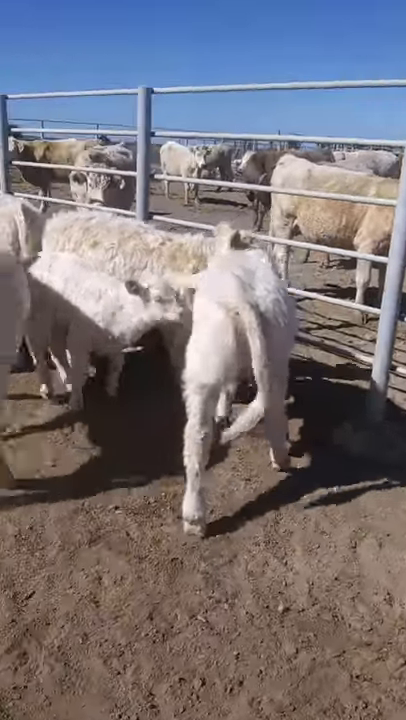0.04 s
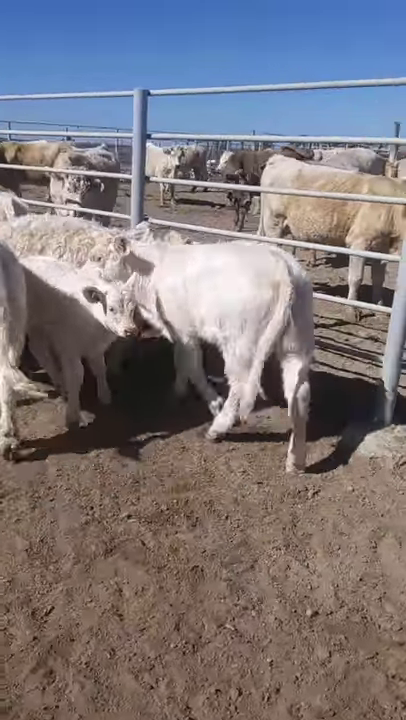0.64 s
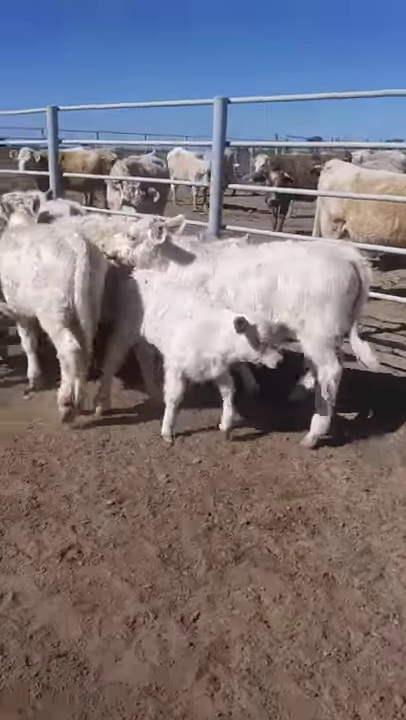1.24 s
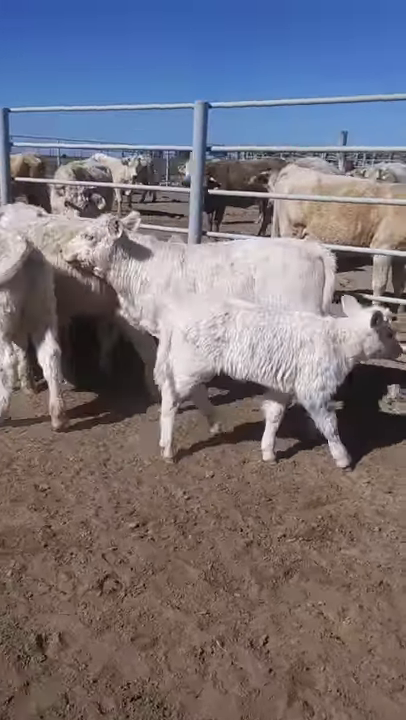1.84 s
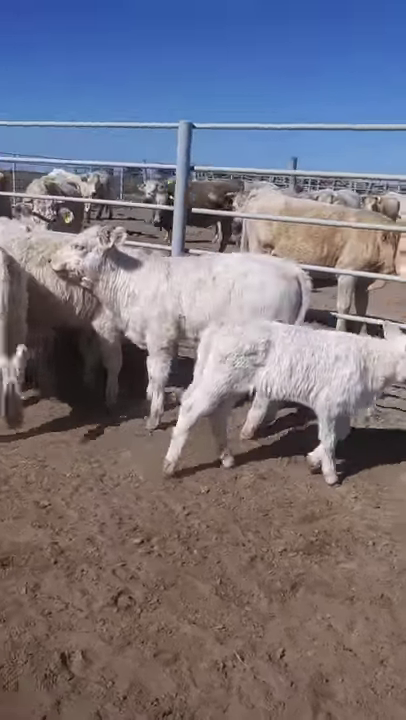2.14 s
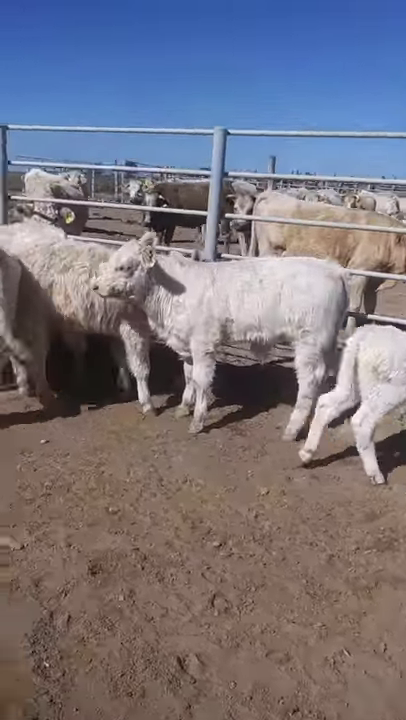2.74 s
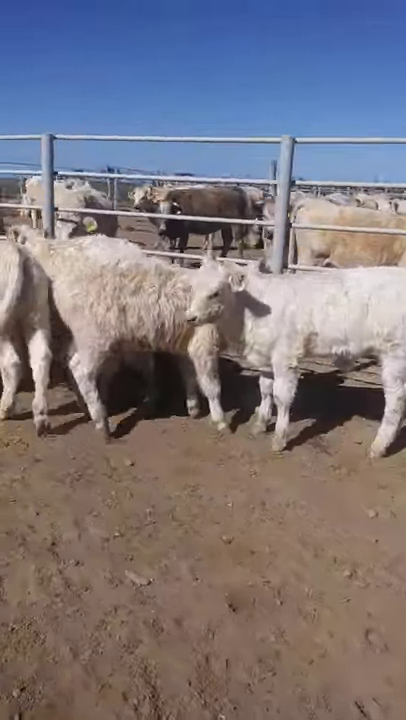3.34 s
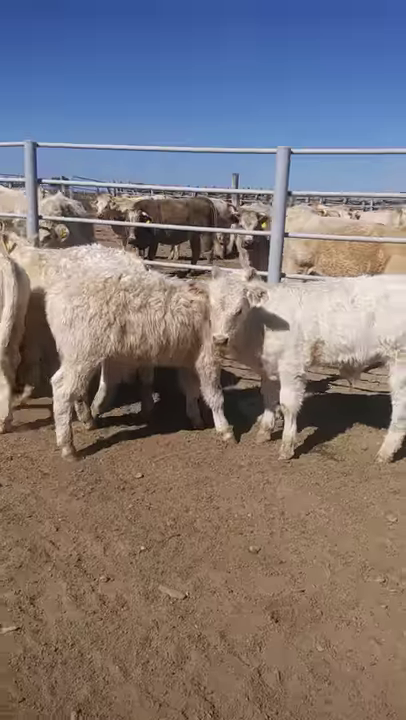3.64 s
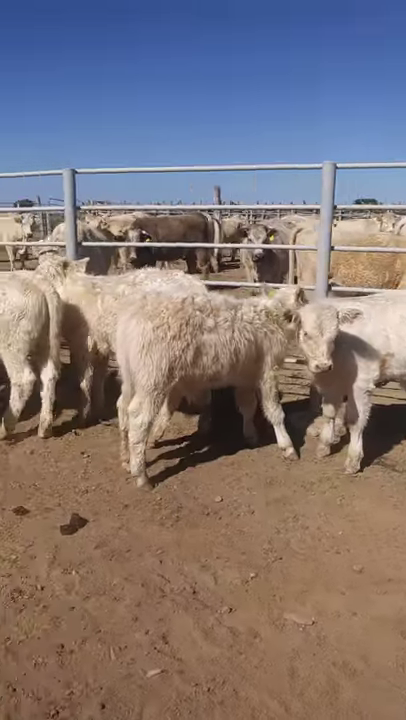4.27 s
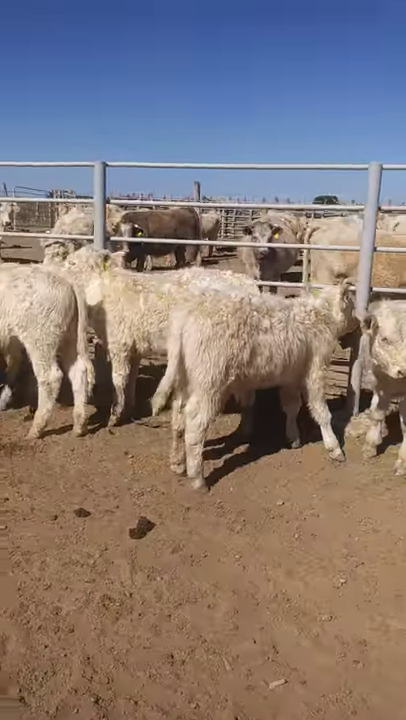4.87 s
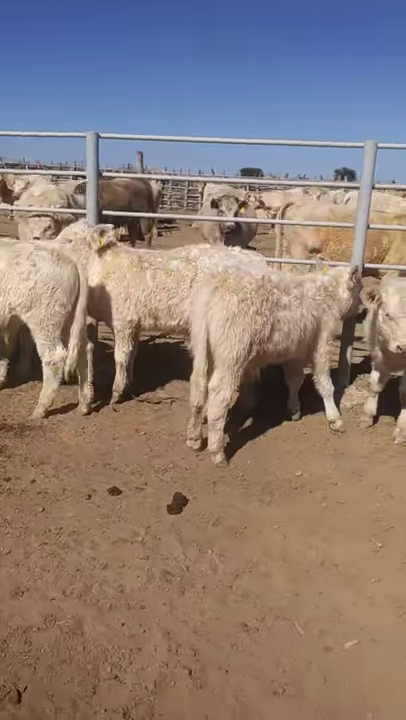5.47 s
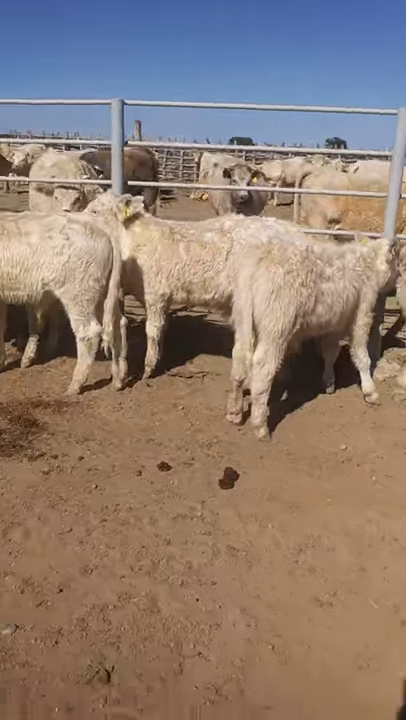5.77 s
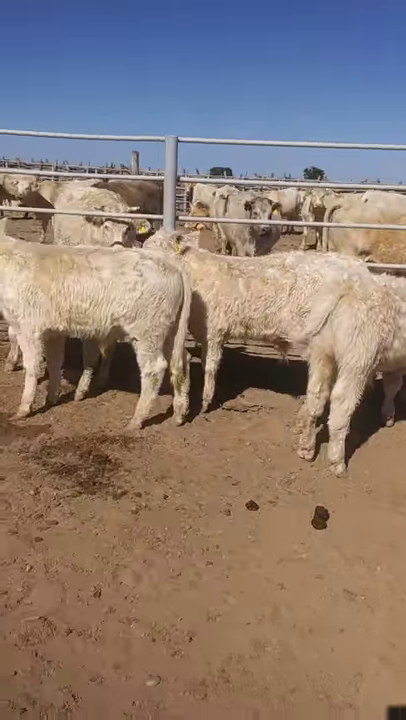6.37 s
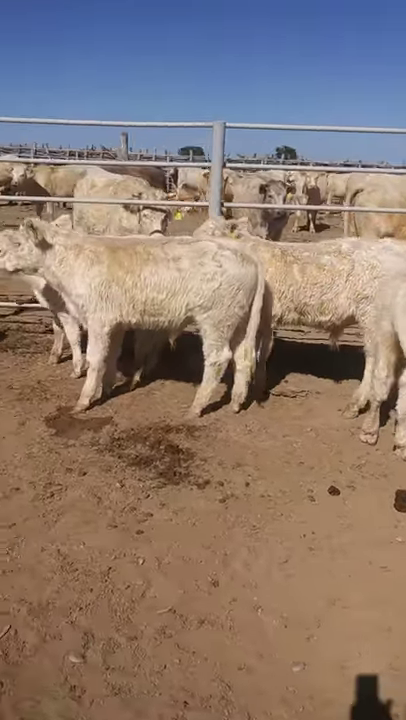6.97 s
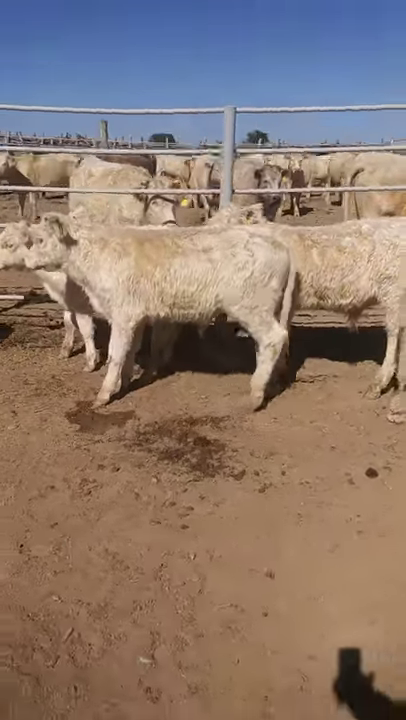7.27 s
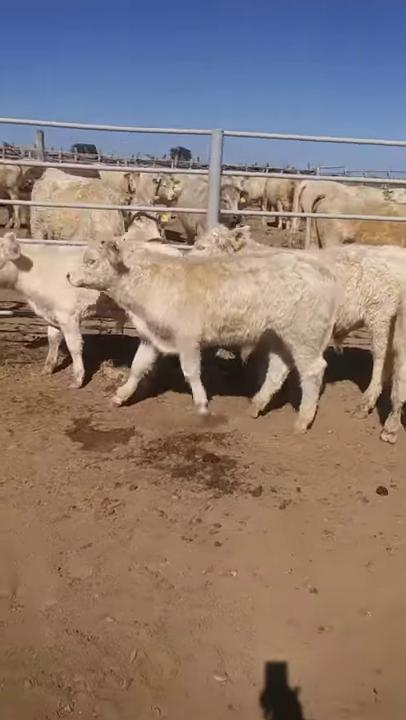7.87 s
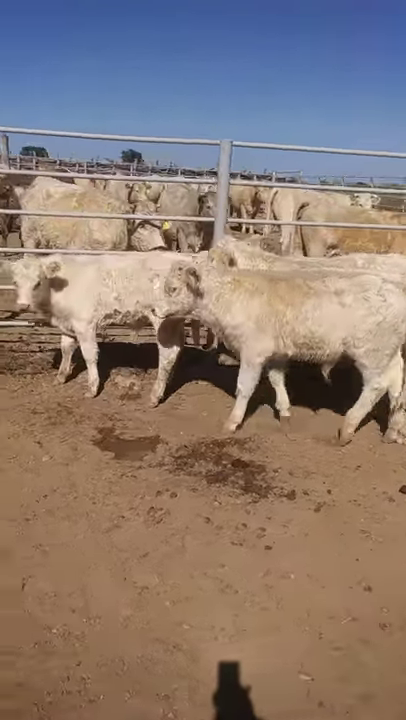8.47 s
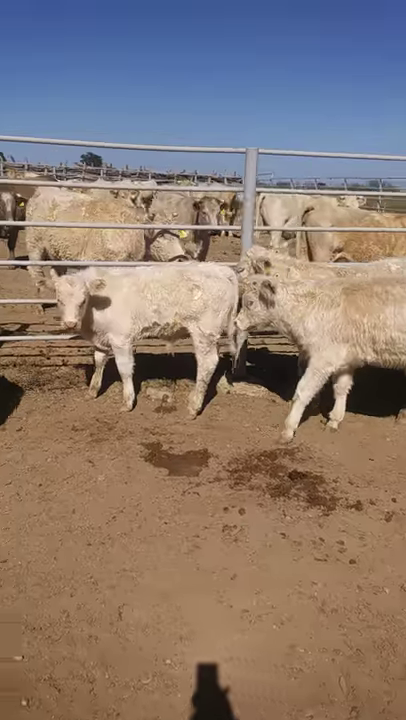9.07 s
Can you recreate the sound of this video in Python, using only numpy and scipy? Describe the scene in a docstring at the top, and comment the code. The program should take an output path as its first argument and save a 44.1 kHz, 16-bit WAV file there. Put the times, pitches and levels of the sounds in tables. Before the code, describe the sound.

Cattle moo and bawl one after another outdoors, with a steel gate clanging and scraping and wind buffeting the microphone.

```python
"""An open cattle pen of steel rails, heard through one microphone out in the wind.
Cattle call in turn: hoarse bawls and a short moo further off, a long clear moo and a creaking groan
close by. Each voice is vocal-fold pulses and breath ringing a throat. A gate scrapes, squeals and
clangs, hooves scuff the grit, and gusts buffet the microphone over the steady air of the yard."""
import sys
import numpy as np
from scipy import signal
from scipy.fft import rfft, irfft
from scipy.io import wavfile
from scipy.ndimage import uniform_filter1d, map_coordinates

SR = 44100
rng = np.random.default_rng(int(sys.argv[2]) if len(sys.argv) > 2 else 0)


def output_pcm(signal):
    """Save a mono or channel-first signal as 16-bit PCM at the path in sys.argv[1].

    Samples are clipped to [-1, 1] before scaling.
    """
    pcm = np.clip(np.atleast_2d(signal).T, -1, 1) * 32767
    wavfile.write(sys.argv[1], SR, np.round(pcm).astype(np.int16))


N = 406161
TIME = np.arange(N) / SR
FILTER_HZ = np.fft.rfftfreq(8192, 1 / SR) + 1
FADE_DB, SILENT_DB = 30, -72   # depth of an attack or release; level at which a voice stops
CLEAR_BREATH_DB, HUSKY_BREATH_DB = -5, 5


def from_db(db):
    return 10 ** (np.asarray(db) / 20)


def rms_one(x):
    return x / np.sqrt(np.mean(x ** 2) + 1e-20)


def at_hz(points, hz):
    """Read a table on a log-frequency axis."""
    table_hz, values = np.transpose(points)
    return np.interp(np.log(hz), np.log(table_hz), values)


def in_time(rows):
    """Read a curve at every sample."""
    return np.interp(TIME, *np.transpose(rows))


def add(out, s, sound):
    """Mix a sound in at its time."""
    start = round(s * SR)
    out[start:start + len(sound)] += sound[:N - start]


def butter(x, hz, kind, order=2):
    return signal.sosfilt(signal.butter(order, min(hz, .45 * SR), kind, fs=SR, output="sos"), x)


def colour(x, gain):
    """Minimum-phase filter with the given gain at FILTER_HZ."""
    cepstrum = irfft(np.log(gain + 1e-6))
    cepstrum[1:len(gain) - 1] *= 2
    cepstrum[len(gain):] = 0
    return signal.fftconvolve(x, irfft(np.exp(rfft(cepstrum))))[:len(x)]


def response(resonances):
    """Gain at FILTER_HZ of a set of steep-sided resonances."""
    peaks = (from_db(db) / (1 + ((FILTER_HZ - hz) / (0.52 * width)) ** 2) for hz, width, db in resonances)
    return np.sqrt(sum(peak ** 2 for peak in peaks))


def drift(per_s, size):
    """Smooth random wander with a spread of about 1."""
    knots = rng.standard_normal(size)[:int(size * per_s / SR) + 4]
    return map_coordinates(knots, [np.arange(size) * per_s / SR], order=2, mode="nearest")


def envelope_db(start, hold, attack, release):
    """Rise by FADE_DB over the attack up to start, hold, and fall by as much over the release."""
    early, late = np.maximum(start - TIME, 0), np.maximum(TIME - start - hold, 0)
    return -FADE_DB * np.minimum(early / max(attack, 1e-3) + late / max(release, 1e-3), 5)


def yard(x, wet_db, t60=0.4, dull_hz=3500):
    """Animals, rails and ground scatter a dull tail to the microphone; wetter sounds further off."""
    t = TIME[:SR]
    tail = rng.standard_normal(SR) * from_db(-60 * t / t60) * (t > .01)
    tail = butter(tail / np.linalg.norm(tail), dull_hz, "low")
    return x + from_db(wet_db) * signal.fftconvolve(x, tail)[:N]


# spectrum of the air all around the pen: f/Hz, level/dB
AIR = [(24, -73.5), (40, -37.5), (273, -6.5), (800, -4.5), (1450, -2.5), (3740, -12.5),
       (4570, -9.5), (5860, -11.5), (15500, -28)]
def air(level_db=-61.5):
    """The faint, steady noise of the open yard."""
    return from_db(level_db) * rms_one(colour(rng.standard_normal(N), from_db(at_hz(AIR, FILTER_HZ))))


def eddy(bright_hz, wake=0.043, wake_s=0.014, low_hz=275):
    """One pressure pulse right on the microphone, with a short wake; peak 1."""
    t = TIME[:SR // 10]
    push = signal.unit_impulse(len(t)) + wake * rng.standard_normal(len(t)) * np.exp(-t / wake_s)
    thump = butter(butter(push, bright_hz, "low", order=7), low_hz, "high", order=4)
    return thump / np.abs(thump).max()


# spectrum of the turbulence at the microphone: f/Hz, level/dB
WIND_SPECTRUM = [(30, -46), (70, -38), (110, -15.5), (160, -0.5), (250, 5.5), (400, 0), (600, -12.5),
                 (850, -18.5), (1300, -26.5), (2500, -48.5), (6000, -97.5)]
# gusts: crest t/s, half length/s, level/dB
GUSTS = [(1.39, 0.48, -59), (1.924, .14, -50), (3.02, .12, -40.5), (3.803, 0.062, -46), (4.26, 0.21, -44),
         (4.548, 0.15, -36.5), (4.917, 0.15, -38), (5.208, 0.076, -49), (5.779, 0.058, -38),
         (5.967, 0.094, -40.5), (7.225, 0.23, -34.5), (7.72, 0.19, -36.5), (7.924, 0.083, -34),
         (9.01, 0.42, -49)]
# the strongest eddies to hit the microphone: t/s, peak level/dB
EDDIES = [(0.933, -30), (1.285, -41), (2.814, -34.5), (2.974, -32.5), (4.287, -27), (4.495, -14),
          (4.59, -30), (4.667, -32), (4.802, -33), (4.861, -25.5), (4.894, -27.5), (4.952, -32),
          (6.037, -26.5), (6.938, -34), (7.054, -17), (7.123, -17), (7.151, -15.5), (7.186, -24),
          (7.202, -17.5), (7.245, -21), (7.281, -20), (7.433, -29), (7.468, -17), (7.595, -30),
          (7.627, -16), (7.717, -22), (7.753, -14), (7.759, -18.5), (7.795, -18.5), (7.885, -16),
          (7.9, -18), (7.938, -21), (7.992, -25.5), (8.997, -25), (9.129, -32)]
def wind(breeze_db=-64.5, swing_db=3.8, lumpy_db=6.5, eddies_per_s=14, small_db=4.0):
    """Lumpy turbulence on the microphone; small random eddies are as strong as the gust they ride."""
    level = from_db(breeze_db + swing_db * drift(6.3, N))
    for s, reach, db in GUSTS:
        level += from_db(db) * np.exp(-2 * np.minimum(((TIME - s) / reach) ** 2, 20))
    lumps = rng.standard_normal(N) * from_db(lumpy_db * np.minimum(drift(130, N), 2))
    rumble = rms_one(colour(lumps, from_db(at_hz(WIND_SPECTRUM, FILTER_HZ))))
    arrivals = (rng.random(N) < eddies_per_s / SR) * rng.uniform(-0.556, 1, N)
    small_eddies = from_db(small_db) * signal.oaconvolve(arrivals, eddy(bright_hz=640))[:N]
    out = level * (rumble + small_eddies)
    for s, peak_db in EDDIES:
        octaves = 0.4956 * np.clip(peak_db + 18, 0, 2)   # brighter above -18 dB
        add(out, s, from_db(peak_db) * eddy(bright_hz=530 * 2 ** octaves))
    return out


# hooves on the grit of the pen: t/s, level/dB, decay/s
SCUFFS = [(0.856, -53.5, 0.047), (1.513, -49, 0.0069), (2.502, -48.5, .003), (3.514, -42.5, 0.014),
          (4.011, -44, .006), (4.574, -50.5, 0.012), (4.662, -49.5, .008), (6.351, -50.5, .005),
          (8.666, -49, 0.0056)]
# hooves on hard ground: t/s, peak level/dB
KNOCKS = [(5.353, -43), (6.331, -36)]
def hooves(knock_hz=880, knock_width_hz=550, knock_s=.004):
    """A hoof grinds a little dry grit, or lands with a dull knock."""
    out, t = np.zeros(N), TIME[:SR // 10]
    for s, db, decay_s in SCUFFS:
        grit = rms_one(butter(rng.standard_normal(len(t)) ** 3, 6500, "low"))
        add(out, s, from_db(db) * butter(grit * np.exp(-t / decay_s), 900, "high"))
    for s, db in KNOCKS:
        impact = rng.standard_normal(len(t)) * np.exp(-t / knock_s)
        knock = colour(impact, response([(knock_hz, knock_width_hz, 0)]))
        add(out, s, from_db(db) * knock / np.abs(knock).max())
    return out


# modes of the gate, latch, bolt and rail: f/Hz, level/dB, t60/s
STEEL_MODES = {"gate": [(1380, -11, 0.38), (1700, -18.5, 0.67), (1830, -19.5, 0.91), (1860, -19, 0.73),
               (2310, -8.5, 0.14), (3236, -13.5, 0.265), (3780, -21.5, 0.55), (4840, -15.5, 0.46),
               (4900, -12, 0.43), (5080, -12.5, 0.39), (5270, -8, 0.28), (5500, -11.5, 0.26),
               (6040, -11, 0.22)], "latch": [(947, -5.5, 0.43), (1265, -11, 0.5), (1760, 1, 0.196),
               (1880, -10, 0.6), (3143, -4.5, 0.21), (3736, -21.5, 0.89), (4190, -8, 0.49),
               (5040, -11, 0.28)], "bolt": [(1106, -16, 0.56), (1500, -16, 0.32), (1850, -14, 0.37),
               (1970, -13.5, 0.56), (4260, -15, .22), (6030, -16.5, 0.13), (6700, -16.5, .17)],
               "rail": [(1038, -13, 0.14), (1178, -24.5, 0.59), (1740, -11.5, 0.2), (1990, -9.5, 0.32),
               (2370, -12.5, 0.123), (3290, -15.5, 0.12), (3680, -21, 0.24), (5070, -32, 0.35)]}
# spectrum of the dense modes of the whole fence: f/Hz, level/dB
CLATTER = [(150, -48), (400, -13.5), (700, -5), (1400, -3.5), (2500, 0), (3800, -2), (5800, -2.5),
           (7000, -11), (9000, -30), (12000, -50.5), (15000, -28.5)]
# how long the fence rings: f/Hz, t60/s
CLATTER_T60 = [(300, 0.49), (1000, 0.61), (2500, 0.31), (5500, 0.25), (12000, 0.39)]
def clang(clatter_db, ring_db, bright_hz, part, modes_per_hz=0.056, flutter=.45, flutter_per_s=70):
    """A blow rings one loose steel part and shakes the dense modes of the fence; treble dies first."""
    t = TIME[:SR]
    edges = np.geomspace(150, 16000, 21)
    chance, angle = rng.random((2, 2, SR // 2 + 1))
    dense_modes = irfft((chance < modes_per_hz) * np.exp(2j * np.pi * angle))
    undamped = clatter = ring = 0
    for k, (low, high) in enumerate(zip(edges, edges[1:])):
        hz = np.sqrt(low * high)
        bandpass = signal.butter(3, [low, high], "band", fs=SR, output="sos")
        band = signal.sosfilt(bandpass, dense_modes[k % 2])   # neighbouring bands use separate modes
        band *= from_db(at_hz(CLATTER, hz)) / np.hypot(1, (hz / bright_hz) ** 2)
        undamped += band
        clatter += band * from_db(-60 * t / at_hz(CLATTER_T60, hz))
    for hz, db, t60 in STEEL_MODES[part]:
        mode = from_db(db - 60 * t / t60) * np.sin(2 * np.pi * hz * t) * rng.choice([-1, 1])
        ring += mode * (1 + flutter * drift(flutter_per_s, SR))
    return butter(from_db(clatter_db) * clatter / np.std(undamped) + from_db(ring_db) * ring, 330, "high")


# blows on the steel of the pen: t/s, clatter level/dB, ring level/dB, treble corner f/Hz, part
CLANGS = [(0.3541, -25.5, -33, 5200, "latch"), (.36, -26, -23.5, 5500, "latch"),
          (0.618, -16, -9.5, 13280, "gate"), (.669, -38, -14.5, 2200, "rail"),
          (1.787, -39.5, -38, 2000, "rail"), (1.827, -38, -23.5, 3800, "rail"),
          (1.862, -38, -28.5, 3500, "bolt"), (2.016, -28, -17.5, 14000, "bolt"),
          (2.3325, -36.5, -19, 3500, "rail")]
def fence():
    """Blows on the steelwork, heard direct with no tail from the yard."""
    out = np.zeros(N)
    for s, *blow in CLANGS:
        add(out, s, clang(*blow))
    return out


def squeal(start_s=1.77, pitch_hz=536, octaves_per_s=-0.49, level_db=-40.5):
    """The dragging gate squeals on a wavering, nearly pure tone that sinks as it slows."""
    hz = pitch_hz * 2 ** (octaves_per_s * (TIME - start_s))
    phase = 2 * np.pi * np.cumsum(hz * (1 + 0.0215 * drift(90, N))) / SR
    level = from_db(level_db + envelope_db(start_s, hold=0.1, attack=0.18, release=0.11))
    return level * (np.sin(phase) + 0.26 * np.sin(2 * phase))


# the gate creeps, then drags: t/s, hold/s, attack/s, release/s, level/dB
STROKES = [(1.742, 0.0265, 0.69, 0.067, -53.5), (1.812, 0.23, 0.092, 0.18, -40.5)]
# resonances of the dragging gate: f/Hz, width/Hz, level/dB
GATE_BODY = [(521, 86.4, -4), (1050, 370, -7), (1503, 410, -1.5), (1790, 319, -2), (2160, 200, -3.5),
             (3300, 563, -8.5), (4264, 820, -10.5), (6170, 1600, -9), (11170, 6000, -49.5)]
def gate_scrape(judder_db=4.0, ring_db=-8.0, ring_t60=0.5):
    """Across the yard, steel drags over steel in dense, uneven slips that keep the bolt ringing."""
    level = sum(from_db(db + envelope_db(*stroke)) for *stroke, db in STROKES)
    slips = rng.standard_normal(N) * from_db(judder_db * drift(90, N))
    t = TIME[:SR // 2]
    bolt = sum(from_db(db - 60 * t / ring_t60) * np.sin(2 * np.pi * hz * t)
               for hz, db, _ in STEEL_MODES["bolt"][1:])
    body = rms_one(colour(slips, response(GATE_BODY)))
    ring = from_db(ring_db) * rms_one(signal.fftconvolve(slips, bolt)[:N])
    grind = rms_one(butter(body + ring, 230, "high")) * level
    return yard(grind, wet_db=4.5) + yard(squeal(), wet_db=-4)


def closures(phase, pitch):
    """The vocal folds shut: one sharp pulse in the middle of each cycle."""
    offset = (phase % 1 - .5) * SR / pitch   # samples from the closure
    return np.sinc(offset) * np.sinc(np.clip(offset / 10, -1, 1)) * np.sqrt(SR / pitch)


def held(throat):
    """A throat that keeps one shape."""
    return [(0, throat)]


def articulate(source, t, shapes, steps=3):
    """Ring the throat, which moves from each shape to the next in a few blended steps."""
    gains = np.array([response(throat) for _, throat in shapes])
    indices = np.arange(len(shapes))
    place = np.interp(t, [s for s, _ in shapes], indices)
    out = 0
    for step in range(steps * (len(shapes) - 1) + 1):
        blend = np.maximum(1 - np.abs(indices - step / steps), 0)
        crossfade = np.maximum(1 - np.abs(place * steps - step), 0)
        out += colour(source * crossfade, blend @ gains)
    return out


def voice(pitch, level_db, rough, shapes, breath_db, sag=0.0, lift=0.0, jitter=0.1006,
          shimmer_db=0.0, hiss_order=1):
    """Fold pulses and puffs of air ring a throat whose resonances sag with time and lift with pitch."""
    sounding = level_db > SILENT_DB
    t = TIME[sounding]
    pitch, level_db, rough = pitch[sounding], level_db[sounding], np.clip(rough[sounding], 0, 1)
    phase = np.cumsum(pitch * (1 + jitter * rough * drift(220, len(t)))) / SR
    # the throat has its own clock, which runs slower as the neck stretches
    wander = .008 * drift(5, len(t))
    clock = np.cumsum(np.exp(wander - sag * (t - t.mean())) * (pitch / np.median(pitch)) ** lift)
    size = int(clock[-1]) + 2
    t, phase, pitch, rough = (np.interp(np.arange(size), clock, c) for c in (t, phase, pitch, rough))
    # the folds slap a second time at a shifting point of the cycle, so upper overtones swell and fade
    slap = .7 * butter(closures(phase - .3 - .01 * drift(4, size), pitch), 2600, "high")
    cycle_gain = from_db(shimmer_db * rough * rng.standard_normal(size)[phase.astype(int)])
    pulses = (closures(phase, pitch) + slap) * cycle_gain
    airflow = rng.standard_normal(size) * np.exp(-2 * ((phase - .5) % 1))
    puffs = rms_one(butter(airflow, 358.8, "high", order=1))
    hiss = butter(puffs, 5500, "high", order=hiss_order)
    source = pulses + from_db(breath_db) * (rough * puffs + .5 * hiss)
    sound = map_coordinates(articulate(source, t, shapes), [clock], order=3)   # back to real time
    sound = butter(sound, 170, "high", order=4)
    sound /= np.sqrt(uniform_filter1d(sound ** 2, size=3000) + 1e-12)   # level_db alone sets the level
    out = np.zeros(N)
    out[sounding] = sound * from_db(level_db)
    return out


def moo_contour(curve, attack_s, break_s, release_s, scoop, droop):
    """Pitch scoops up into full voice and droops at the break (octaves/s); then the air runs out."""
    s, pitch, level_db = np.transpose(curve)
    slide = scoop * np.maximum(s[0] - TIME, 0) + droop * np.maximum(TIME - s[-1], 0)
    effort_db = envelope_db(s[0], s[-1] - s[0] + break_s, attack_s, release_s)
    return np.interp(TIME, s, pitch) * 2 ** -slide, np.interp(TIME, s, level_db) + effort_db


# plainer calls, near and far: t/s, hold/s, attack/s, release/s, f/Hz, glide/(octaves/s), level/dB,
# swell/(dB/s), roughness/0-1, name
PLAIN_CALLS = [(0.0, 0.24, .01, 0.19, 192.5, 0.6, -26, -25.5, 0.4, "first bawl"),
               (5.043, 0.46, 0.095, 0.48, 107.2, 0, -61, -14, 0.35, "far moo"),
               (6.87, 0.03, .075, 0.18, 55.5, 2.2, -45.5, -42, 0.05, "tight groan"),
               (7.84, 0.33, 0.33, 0.34, 88.6, 0.04, -52, 3, 0.16, "open groan"),
               (9.061, 0.12, 0.64, 0.074, 151.7, 0.5, -51, -40, 1, "wind-up"),
               (9.172, 0.0389, 0.0098, .1, 163.8, 1, -30, -110, 0.16, "last bawl")]
def plain_call(name, droop=0.0):
    """Pitch, level and roughness of a call that glides evenly, then droops (octaves/s) in release."""
    call = next(row[:-1] for row in PLAIN_CALLS if row[-1] == name)
    start, hold, attack, release, hz, glide, db, swell, rough = call
    held_s, late_s = np.clip(TIME - start, 0, hold), np.maximum(TIME - start - hold, 0)
    pitch = hz * 2 ** (glide * held_s - droop * late_s)
    level_db = db + swell * held_s + envelope_db(start, hold, attack, release)
    return pitch, level_db, np.full(N, rough)


# throat resonances that carry from a far pen: f/Hz, width/Hz, level/dB
FAR_THROAT = [(1420, 490, -1), (2120, 140, 9), (2690, 200, 3.5)]
def far_moo():
    """A faint, husky call from a far pen."""
    return voice(*plain_call("far moo"), held(FAR_THROAT), HUSKY_BREATH_DB, sag=0.31)


# throats of the first and last bawls: f/Hz, width/Hz, level/dB
FIRST_THROAT = [(205, 78, -1.5), (520, 350, -12), (874, 179.5, 4), (1193, 670, -5), (1700, 330, -4.5),
                (2170, 390, -4), (3210, 321, -18.5), (4765, 1850, -27)]
LAST_THROAT = [(586, 580, 1.5), (970, 240, -3.5), (1446, 140, 6), (1780, 160, 3.5), (2200, 370, -3.5),
               (2910, 370, -6.5), (4700, 2400, -23.5)]
def bawls():
    """Hoarse bawls well back from the microphone, more breath than tone."""
    first = voice(*plain_call("first bawl", droop=3.0), held(FIRST_THROAT), breath_db=15.5, jitter=0.0618)
    return first + sum(voice(*plain_call(name), held(LAST_THROAT), breath_db=30.0)
                       for name in ("wind-up", "last bawl"))


# the short moo in full voice: t/s, f/Hz, level/dB
SHORT_MOO = [(5.56, 138.5, -55.5), (5.596, 148.8, -48), (5.636, 168.1, -48), (5.692, 189, -44.5),
             (5.832, 194.6, -38), (5.895, 194.3, -38), (5.915, 189.1, -37), (6.134, 187, -35),
             (6.2, 179.7, -37.5), (6.25, 158.2, -38)]
# its rasp: t/s, roughness/0-1
SHORT_MOO_ROUGH = [(5.65, .5), (5.72, .1), (5.83, .1), (5.9, .42), (6.02, .1), (6.15, .17), (6.23, .45)]
# its throat, from tight to wide: f/Hz, width/Hz, level/dB
SHORT_THROAT_TIGHT = [(193, 130, 0), (430, 180, -3), (1120, 510, -2), (2000, 300, -7), (2550, 390, -3),
                      (4570, 1900, -27)]
SHORT_THROAT = [(194, 160, 2), (440, 260, -8), (935, 280, -5), (1136, 73, 8), (1460, 1000, -10),
                (1926, 83, 4.5), (2320, 180, 2), (2730, 290, -11)]
SHORT_THROAT_WIDE = [(203, 380, 3.5), (440, 190, -1), (896, 95, 7), (1150, 124, 10), (1420, 610, -3.5),
                     (1945, 230, 2.5), (2280, 190, 7.5), (2640, 470, -1), (4430, 3800, -26)]
# the mouth opens: t/s, resonances
SHORT_MOO_MOUTH = [(5.63, SHORT_THROAT_TIGHT), (5.78, SHORT_THROAT), (6.08, SHORT_THROAT_WIDE)]
def short_moo():
    """At middle distance, a higher, husky moo cracks on the way up, swells and drops away."""
    pitch, level_db = moo_contour(SHORT_MOO, attack_s=.09, break_s=0.008, release_s=0.086,
                                  scoop=1.705, droop=9.3)
    return voice(pitch, level_db, in_time(SHORT_MOO_ROUGH), SHORT_MOO_MOUTH, HUSKY_BREATH_DB,
                 lift=.15, jitter=0.084, shimmer_db=3.0)


# the groan in full voice: t/s, f/Hz, level/dB
GROAN = [(7.0, 62.6, -51.5), (7.146, 65.3, -54), (7.35, 67.44, -47.5), (7.51, 68.6, -45.5),
         (7.832, 68.14, -44), (8.0, 67.5, -47)]
# its rasp: t/s, roughness/0-1
GROAN_ROUGH = [(7.0, .25), (7.4, .16), (7.8, .16), (8.05, .3)]
# its throat, from tight to open: f/Hz, width/Hz, level/dB
GROAN_TIGHT = [(370, 490, 1.5), (2100, 160, -2), (2620, 61, 10.5), (2910, 450, 0.5), (4280, 290, 5.5),
               (5050, 350, 5)]
GROAN_THROAT = [(352, 930, 3.5), (2080, 190, -5.5), (2600, 360, -5), (3120, 90, -2), (4220, 750, -12.5),
                (4840, 130, -2), (5410, 140, 4.5)]
GROAN_FULL = [(347, 420, 11), (1000, 380, -14), (1552, 53, 5), (2010, 130, -3.5), (2720, 280, -6),
              (3065, 126, 3.5), (4400, 310, -8), (4785, 89, -3), (5430, 100, -6.5), (6430, 970, -19.5)]
GROAN_OPEN = [(328.4, 450, 4.5), (980, 350, 4), (2300, 940, -6.5), (4400, 790, -10.5), (5630, 170, -4.5)]
# the mouth in mid-groan: t/s, resonances
GROAN_SHAPES = [(7.2, GROAN_THROAT), (7.6, GROAN_FULL)]
def groan():
    """Close by, folds beat slowly enough to creak: tight, then fuller, ending with the mouth open."""
    pitch, level_db = moo_contour(GROAN, attack_s=0.067, break_s=0.016, release_s=0.24,
                                  scoop=0.27, droop=0.23)
    tight = voice(*plain_call("tight groan"), held(GROAN_TIGHT), HUSKY_BREATH_DB)
    full = voice(pitch, level_db, in_time(GROAN_ROUGH), GROAN_SHAPES, CLEAR_BREATH_DB,
                 sag=0.028, jitter=0.148, shimmer_db=9.0)
    opened = voice(*plain_call("open groan", droop=0.31), held(GROAN_OPEN), CLEAR_BREATH_DB)
    return tight + full + opened


# the long moo in full voice: t/s, f/Hz, level/dB
LONG_MOO = [(3.3, 124.7, -35), (3.404, 134.3, -26), (3.604, 140.8, -21), (3.83, 144.8, -22.5),
            (3.994, 143.8, -24), (4.112, 142.6, -23.5), (4.246, 138.7, -23.5), (4.356, 134.3, -27.5),
            (4.405, 130.6, -27), (4.44, 118.3, -28.5)]
# its rasp: t/s, roughness/0-1
LONG_MOO_ROUGH = [(3.15, .2), (3.3, .1), (3.42, .02), (4.28, .02), (4.36, .08), (4.42, .25), (4.47, .8)]
# resonances of its nose and throat: f/Hz, width/Hz, level/dB
NOSE = [(278, 260, -12.5), (870, 520, -0.5), (1880, 350, 5), (2383, 124, 9), (3120, 920, -1),
        (5050, 2600, -20), (6600, 780, -13.5), (9740, 1000, -28)]
PARTED_THROAT = [(280, 107, -14), (564, 60, -10), (732, 49, 4.5), (900, 140, 1.5), (1080, 130, -2),
                 (1258.6, 53, 9.5), (1594, 65, 0), (1900, 220, -4.5), (2286, 110, 3), (2595, 200, -2.5),
                 (2810, 110, -7), (3150, 100, -11), (3640, 80, -17), (4175, 120, -16.5), (5200, 2200, -34)]
OPEN_THROAT = [(305, 38, -4.5), (583, 45, -3), (697, 73, 5), (880, 65, 0.5), (958, 85, 8), (1237, 82, 4.5),
               (1598, 61, -3.5), (1930, 390, -11.5), (2238, 170, 2.5), (2618, 157, 0.5), (3137, 67, -15),
               (3540, 70, -16), (4330, 330, -25.5), (5850, 200, -25), (6450, 82, -21), (7150, 950, -39.5),
               (10370, 460, -44.5)]
CLOSING_THROAT = [(250, 66, -4), (696, 76, 1), (815, 200, -3.5), (994, 115, 6), (1285, 71, 1),
                  (1626, 104, -2), (1990, 500, -9.5), (2290, 96, -1.5), (2680, 350, -7.5), (3210, 70, -11),
                  (3617, 52, -19), (4410, 220, -21), (5850, 720, -27), (7000, 1400, -37)]
# the mouth parts, opens and closes: t/s, resonances
LONG_MOO_SHAPES = [(3.55, PARTED_THROAT), (3.76, OPEN_THROAT), (4.0, OPEN_THROAT), (4.22, CLOSING_THROAT)]
def long_moo(hum_db=-40.0):
    """Close to the microphone, a long clear moo starts as a hum in the nose before the mouth opens."""
    pitch, level_db = moo_contour(LONG_MOO, attack_s=.1, break_s=0.0507, release_s=0.12,
                                  scoop=1.6, droop=3.0)
    rough = in_time(LONG_MOO_ROUGH)
    nose_db = hum_db + envelope_db(start=3.0, hold=.27, attack=0.2, release=.24)
    hum = voice(pitch, nose_db, rough, held(NOSE), HUSKY_BREATH_DB, sag=.27)
    mouth = voice(pitch, level_db, rough, LONG_MOO_SHAPES, CLEAR_BREATH_DB,
                  lift=0.2, jitter=0.09, hiss_order=3)
    return hum + mouth


def scene():
    """The pen from one spot: cattle at three distances, steelwork, hooves, wind and air, in mono."""
    far = bawls() + far_moo()
    near = long_moo() + groan()
    cattle = yard(near, wet_db=-15) + yard(short_moo(), wet_db=-8) + yard(far, wet_db=-2.5)
    return (cattle + gate_scrape() + fence() + hooves() + wind() + air())[None]


def record(dry):
    """The microphone's signal is cut steeply above 15.8 kHz."""
    return signal.sosfilt(signal.ellip(10, .1, 80, 15800, fs=SR, output="sos"), dry)


dry = scene()
out = record(dry)
output_pcm(out)
```